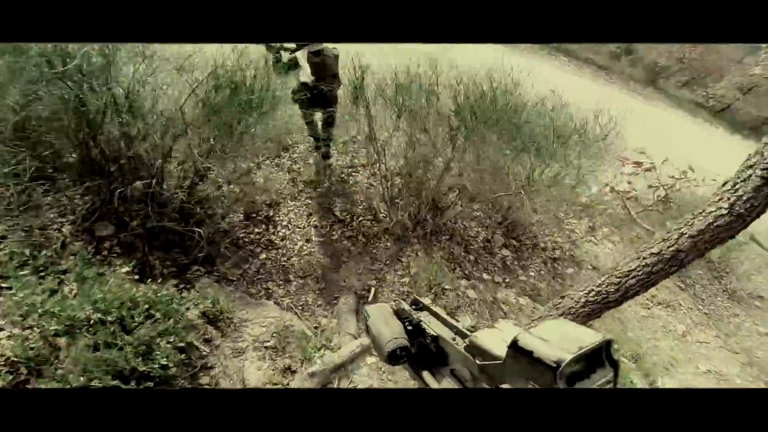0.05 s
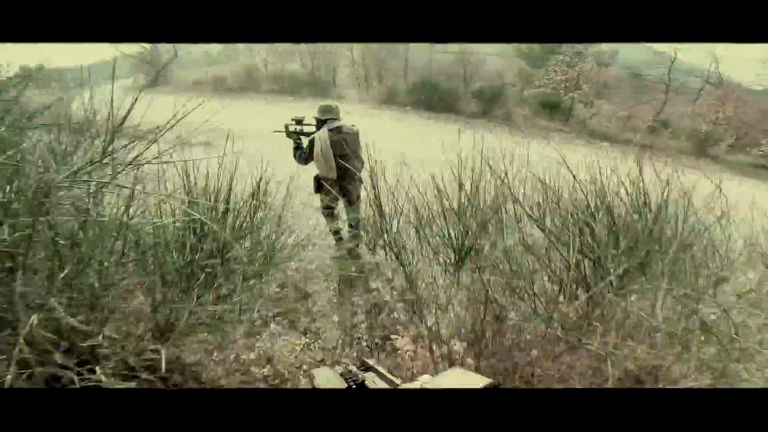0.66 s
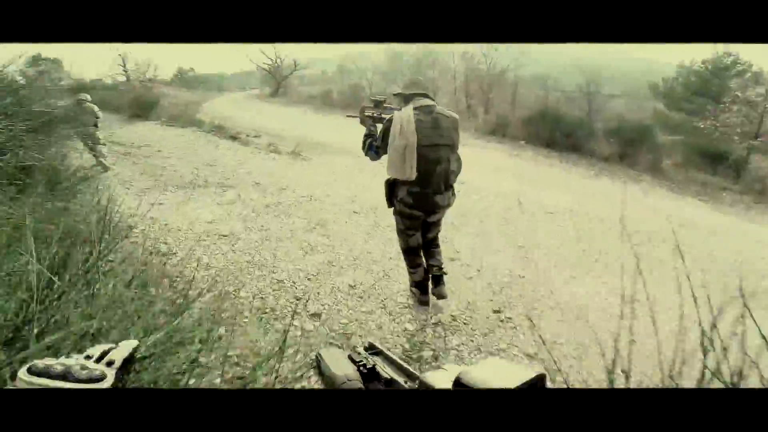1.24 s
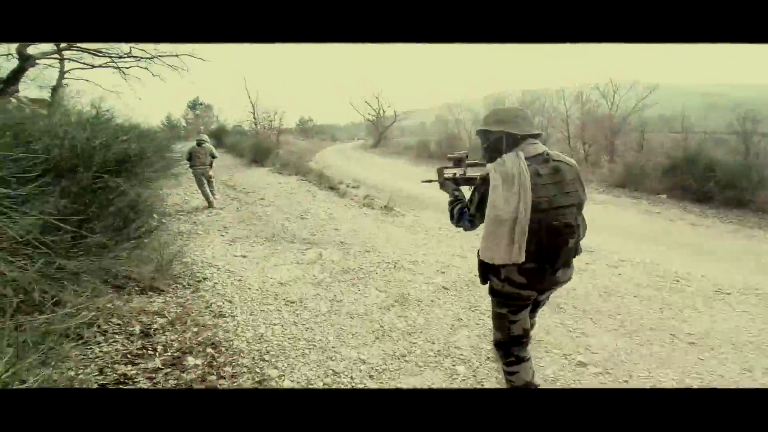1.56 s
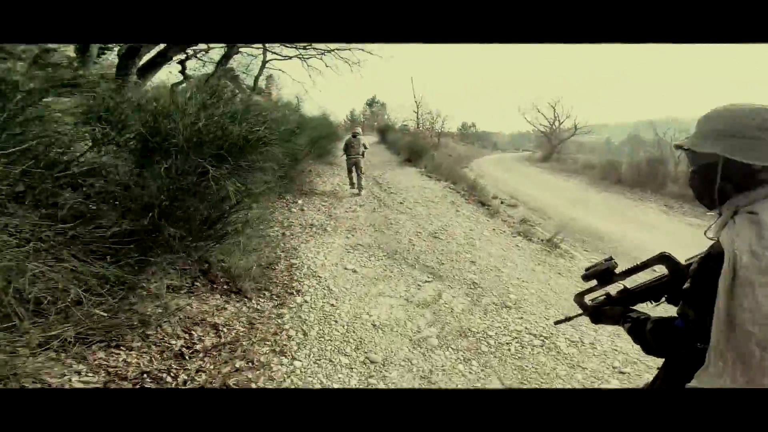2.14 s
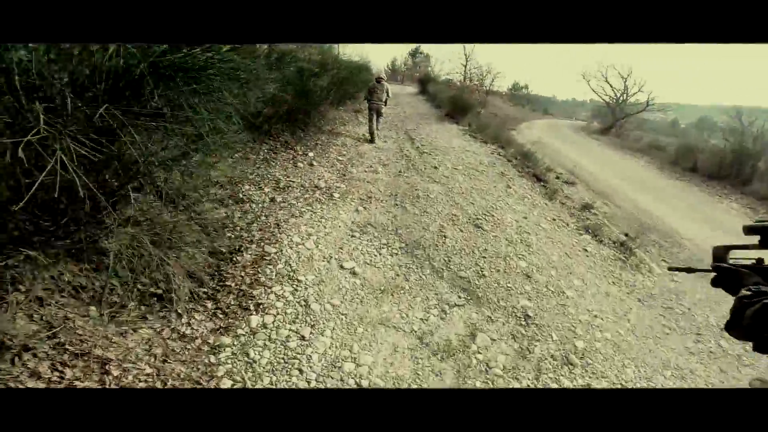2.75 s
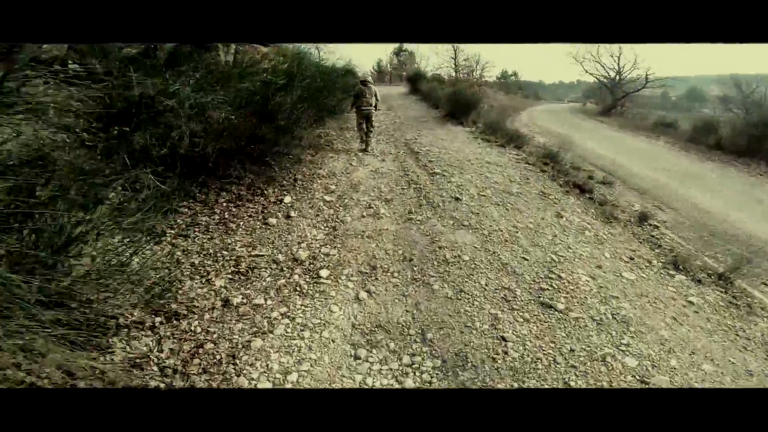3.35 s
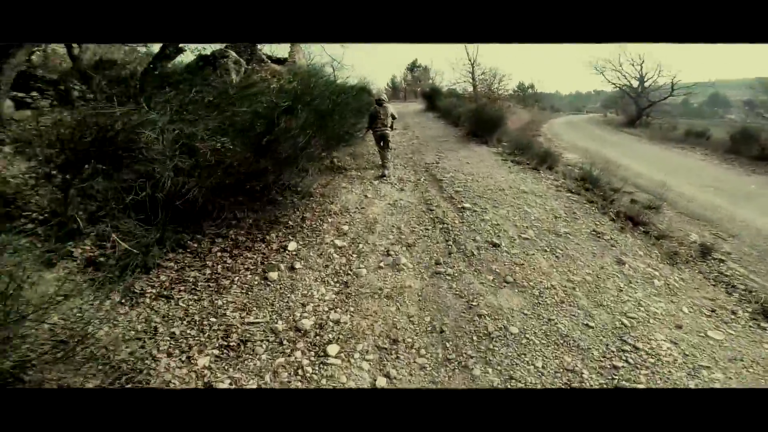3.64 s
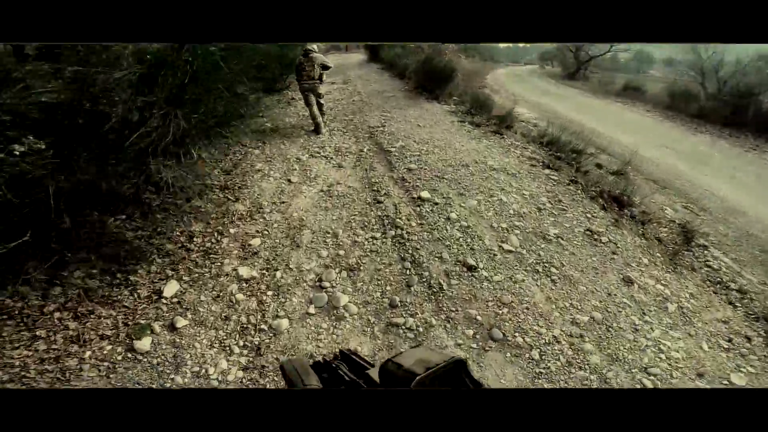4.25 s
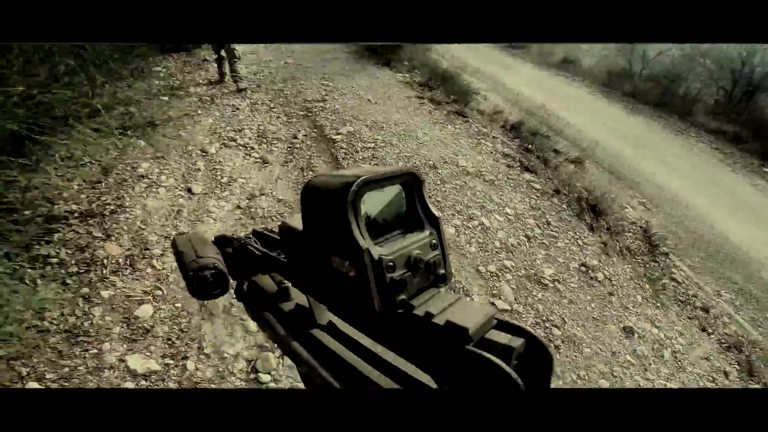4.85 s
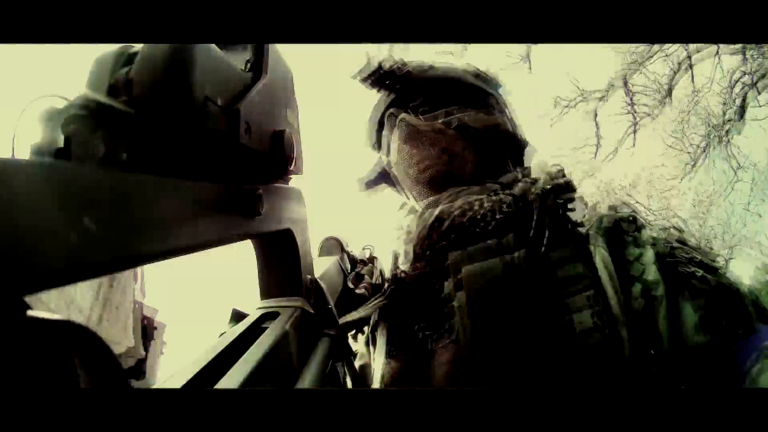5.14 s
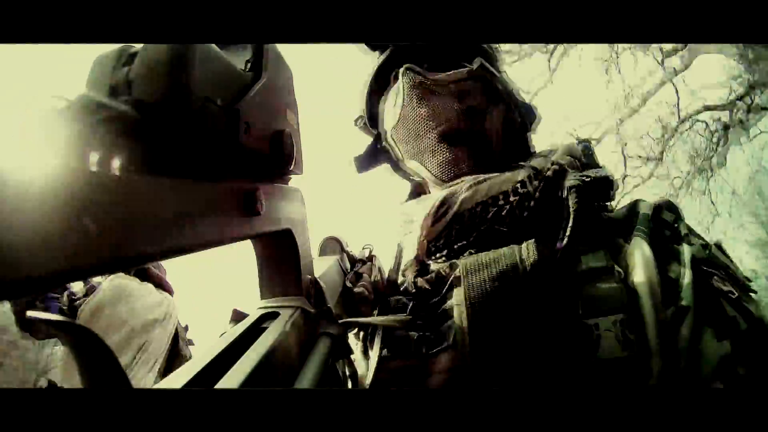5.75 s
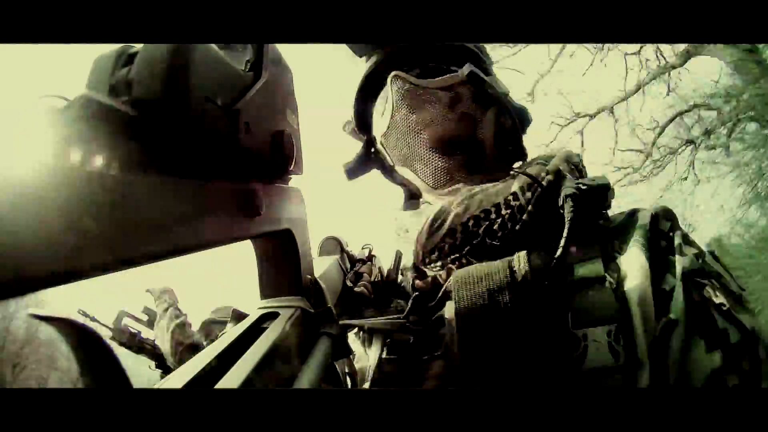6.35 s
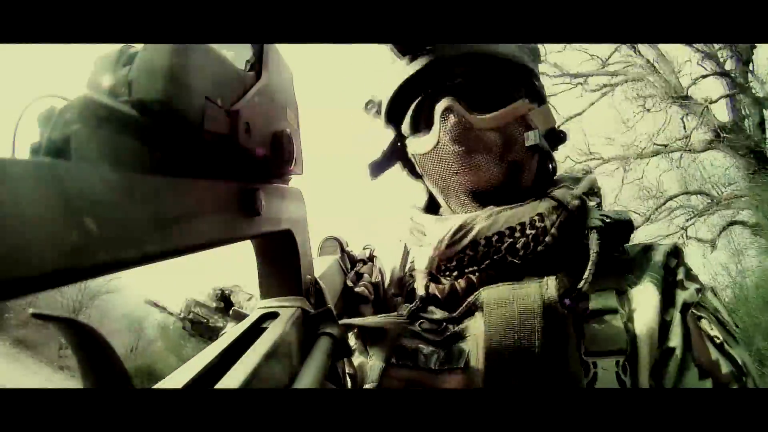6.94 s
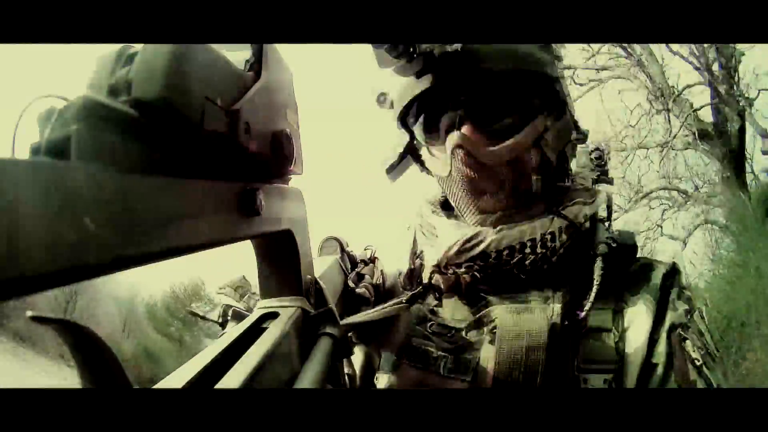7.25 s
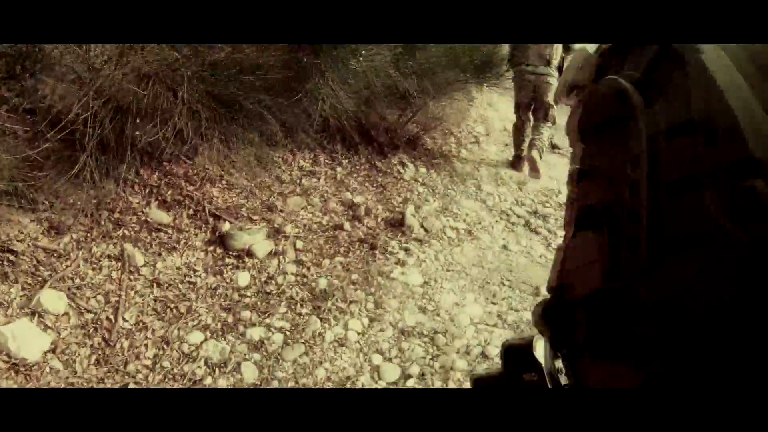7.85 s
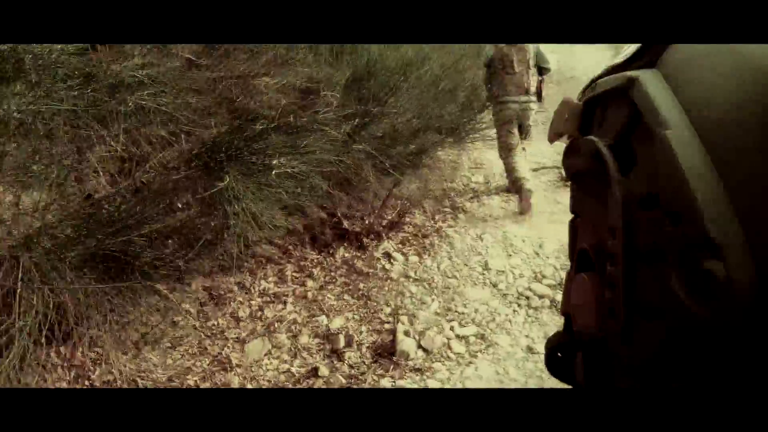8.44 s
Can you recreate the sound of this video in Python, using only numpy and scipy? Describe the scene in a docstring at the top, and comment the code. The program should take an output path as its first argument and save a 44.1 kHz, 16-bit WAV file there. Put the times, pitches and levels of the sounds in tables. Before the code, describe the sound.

Someone in field gear hurries outdoors, heard close from a camera strapped to the body. Uneven steps land as deep, dull thuds with a lighter gravel crunch over a soft low rumble of air. For the first 1.4 seconds dry stems crackle and swish, while gear knocks on the case at about 0.4, 0.8 and 1.4 seconds, with a sharp click at 1.2. A loud, booming double bump with a short rasp comes just after 2 seconds. From 3 to 5 seconds the steps are steadier, about two a second, with scuffs and loose stones snapping aside. A hard knock and crack at 5.4 seconds overloads the microphone and briefly dips the level. Slower steps continue, with a heavier one at 6.8. A faint low hum sets in around 7.5 seconds and stays, and another heavy thump hits at 8.1, among lighter steps.

```python
"""Hurrying through brush and gravel

Someone in field gear hurries through brush and along a gravel track, a camera strapped to the body.
Treads thud through the strap and crunch the stones; gear knocks, clicks and rubs on the camera's case.
Hard jolts overload the microphone and duck its gain. A faint hum sets in near the end."""
import sys
import numpy as np
from scipy import signal
from scipy.fft import rfft, irfft, next_fast_len
from scipy.io import wavfile
from scipy.ndimage import uniform_filter1d, minimum_filter1d, map_coordinates

SR = 44100
rng = np.random.default_rng(int(sys.argv[2]) if len(sys.argv) > 2 else 0)


def generate_wav(signal):
    """Clip the signal to [-1, 1] and save it as 16-bit WAV at the path in sys.argv[1]."""
    frames = np.transpose(np.atleast_2d(signal))
    scaled = np.clip(frames, -1, 1) * 32767
    pcm = np.round(scaled).astype(np.int16)
    wavfile.write(sys.argv[1], SR, pcm)


N = 383435
TIME = np.arange(N) / SR
AGE = np.arange(int(.4 * SR)) / SR  # seconds since a hit
TOP_HZ = 15400

# Footfalls. Each row: landing in seconds, then thud, gravel and gear-bump levels in dB.
FOOTFALLS = [(.372, -12, -61, -40), (0.778, -21, -58, -38), (1.763, -32.5, -64, -43),
             (2.531, -33, -73, -54), (2.944, -21, -55, -38), (3.392, -21, -64.5, -41.5),
             (3.722, -20, -50, -36), (4.119, -16.5, -52, -33), (4.597, -22, -53.5, -50.5),
             (5.032, -24, -52, -37), (5.155, -28.5, -65, -64), (5.608, -20.5, -57.5, -67),
             (6.18, -29.5, -56.5, -49.5), (6.752, -15, -52, -41), (7.221, -21, -65, -48),
             (7.821, -33, -74, -65), (8.39, -33.5, -61.5, -63)]
# Gear striking the camera. Each row: start in seconds, boom in dB, clack in dB, boom pitch in Hz,
# first rebound in dB relative to the blow.
GEAR_BLOWS = [(0.375, -28, -29.5, 128, -22), (.395, -16.5, -19.5, 110, -15.5), (.83, -3.5, -15.5, 235, -27),
              (.908, -9, -20.5, 239, -21.5), (1.216, -20.5, -17.5, 171, -22.5),
              (1.409, -4, -18.5, 216, -24.5), (1.464, -35, -32.5, 192, -28), (1.744, -38.5, -42, 123, -14),
              (2.0422, -2, -16.5, 107.6, -12.5), (2.125, -2, -23.5, 86.4, -6),
              (2.255, -17.5, -41.5, 120, -18), (3.279, -33.5, -47.5, 159, -14),
              (5.351, -2.5, -20, 249, -23), (5.355, 2.5, -9, 98.8, -30.5), (6.771, -19.5, -32.5, 121, -12),
              (8.095, 1.5, -26, 111.3, -32), (8.113, -10, -27.5, 84, -27), (8.164, -25, -41.5, 149, -10)]
# Tone curves of a thud through the strap, a clack on the case and a snapping stone.
# Each row: frequency in Hz, relative level in dB.
THUD_EQ = [(15, -9.5), (28, -2.5), (44, 3.5), (68, -7), (125, -17), (190, -30), (290, -31.5), (450, -52.5),
           (1200, -86.5)]
CLACK_EQ = [(150, 7.5), (400, 2.5), (600, -0.5), (830, 8.5), (1100, -0.5), (1550, 6), (2400, -1),
            (3100, -10), (3900, -18.5), (6300, -35.5), (9000, -57), (15000, -48.5)]
STONE_EQ = [(700, -15), (1900, -2.5), (2400, -3.5), (2950, 2.5), (3900, -1), (5200, -0.5), (6400, 1),
            (7500, -6.5), (9000, -18.5), (10400, -10), (12000, -23.5), (15000, -25)]


def amp(db):
    """Decibels to gain."""
    return 10 ** (np.asarray(db) / 20)


def unit(x):
    """Scale to rms 1."""
    return x / np.sqrt(np.mean(x ** 2) + 1e-20)


def burst(x, span):
    """Scale a hit to rms 1 over its first span seconds."""
    return x / np.sqrt(np.mean(x[:int(span * SR)] ** 2) + 1e-20)


def fade(t60):
    """A hit's tail, falling 60 dB in t60 seconds."""
    return amp(-60 * AGE / t60)


def add(track, s, sound):
    """Mix a sound into the track at s seconds."""
    start = max(round(s * SR), 0)
    track[start:start + len(sound)] += sound[:N - start]


def colour(x, eq, size=4096):
    """Minimum-phase EQ through (Hz, dB) points; white noise keeps its level."""
    hz, db = np.transpose(eq)
    curve_db = np.interp(np.log(np.fft.rfftfreq(size, 1 / SR) + 1), np.log(hz), db)
    cepstrum = irfft(np.log(amp(curve_db)))
    cepstrum[1:size // 2] *= 2
    cepstrum[size // 2 + 1:] = 0
    kernel = irfft(np.exp(rfft(cepstrum)))
    return signal.oaconvolve(x, kernel / np.linalg.norm(kernel))[:len(x)]


def modes(table):
    """One damped sine for each (Hz, dB, t60) row."""
    return np.array([amp(db) * fade(t60) * np.sin(2 * np.pi * hz * AGE) for hz, db, t60 in table])


def grains(size, rate, spread_db):
    """Tiny random impacts of uneven strength, about rate a second, rms 1."""
    strength = amp(spread_db * np.minimum(rng.exponential(size=size), 3))
    return unit((rng.random(size) < rate / SR) * strength * rng.choice([-1, 1], size))


def pings(rate, pitch_hz, cycles, spread_db, size=160):
    """Small colliding bits, each ringing briefly within an octave of pitch_hz, rms 1."""
    when, pitch, force = np.hsplit(rng.random((int(rate * N / SR), 3)), 3)
    samples = (when * N).astype(int) + np.arange(size)
    hz = pitch_hz * 2 ** (2 * pitch - 1)
    strength = amp(spread_db * np.minimum(-np.log(1 - force), 3))
    turns = hz * np.arange(size) / SR
    rings = strength * np.sin(2 * np.pi * turns) * np.exp(-turns / cycles)
    return unit(np.bincount(samples.ravel(), rings.ravel(), N)[:N])


def swells(rows):
    """An envelope of bell-shaped strokes from (middle s, half length s, dB) rows."""
    track = np.zeros(N)
    for s, half, db in rows:
        start = max(s - 3 * half, 0)
        t = start + np.arange(int(6 * half * SR)) / SR
        add(track, start, amp(db) * np.exp(-.5 * ((t - s) / half) ** 2))
    return track


def wobble(rate):
    """A smooth random curve, rate knots a second."""
    return map_coordinates(rng.standard_normal(int(N * rate / SR) + 4), [TIME * rate])


def landings(roll_lag_s=.09, strap_db=-12.5):
    """(s, thud dB) of all that shakes the strap: heels, rolls onto the ball of the foot, gear blows."""
    heels = [(s, db) for s, db, _, _ in FOOTFALLS]
    rolls = [(s + roll_lag_s, -21.5 + .54 * db) for s, db in heels]
    return heels + rolls + [(s, db + strap_db) for s, db, _, _, _ in GEAR_BLOWS]


def treads(rise_s=.0022, shudder_t60=.32, heave_hz=44, heave_t60=.22, heave_db=-2):
    """The body's weight lands softly; only a deep heave and shudder get up through the strap."""
    track = np.zeros(N)
    attack = 1 - np.exp(-AGE / rise_s)
    for s, db in landings():
        jolt = rng.standard_normal(len(AGE)) * attack * fade(shudder_t60)
        shudder = burst(colour(jolt, THUD_EQ), .06)
        hz = heave_hz * rng.lognormal(0, .16)
        heave = burst(np.sin(2 * np.pi * hz * AGE) * attack * fade(heave_t60), .06)
        add(track, s, amp(db) * burst(shudder + amp(heave_db) * heave, .06))
    return track


def contacts(bump_lag_s=.025, bump_hz=128, flight_s=.016, loss_db=2.5, rebound_hz=208):
    """(s, boom dB, clack dB, Hz) as gear swings in after each step, or strikes and rebounds thrice."""
    rows = [(s + bump_lag_s, db + 4, db, bump_hz) for s, _, _, db in FOOTFALLS]
    for s, boom_db, clack_db, hz, rebound_db in GEAR_BLOWS:
        rows.append((s, boom_db, clack_db, hz))
        for k, delay in enumerate(np.cumsum(flight_s * rng.lognormal(0, .12, 3))):
            db = rebound_db - loss_db * k
            rows.append((s + delay, boom_db + db - 4, clack_db + db, rebound_hz))
    return rows


def knocks(life_cycles=8.2, build_cycles=.52, mount_db=-8, clack_rise_s=.0015, chatter_db=-15):
    """A bump booms for a few cycles, rocks the mount and clacks the case, which chatters in its clip."""
    # The camera rocking on its mount. Each row: pitch in Hz, relative level in dB, t60 in seconds.
    mount_modes = [(53.5, 0.5, 0.066), (76.5, -12.5, 0.29), (139, -2, 0.088), (284.5, 2.5, 0.049),
                   (411, 4.5, 0.025), (536, -10.5, 0.039)]
    booms, clacks = np.zeros(N), np.zeros(N)
    rocking, mode_hz = modes(mount_modes), np.array(mount_modes)[:, 0]
    striking = (1 - np.exp(-AGE / clack_rise_s)) * fade(.022)
    for s, boom_db, clack_db, hz in contacts():
        # Soft, low bumps build up slowly and hardly reach the mount's upper modes.
        push = 1 - np.exp(-hz * AGE / build_cycles)
        reach = amp(mount_db) / np.hypot(1, mode_hz / hz)
        tone = np.sin(2 * np.pi * hz * AGE) * fade(life_cycles / hz)
        boom = push * (tone + reach @ rocking)
        contact = rng.standard_normal(len(AGE)) * striking
        chatter = amp(chatter_db) * grains(len(AGE), rate=650, spread_db=7) * fade(.075)
        add(booms, s, amp(boom_db) * burst(boom, .02))
        add(clacks, s, amp(clack_db) * burst(contact + chatter, .01))
    return booms + colour(clacks, CLACK_EQ)


def crunch(press_half_s=.041, sand_gain=.38, loose_db=-7, drag_dirt_db=-8.5, clump_db=3):
    """Soles grind pebbles in clumps over hissing sand and duller packed dirt; loose stones tick aside."""
    # Feet dragging between steps. Each row: middle and half length in seconds, gravel level in dB.
    scuffs = [(1.06, 0.058, -55.5), (2.69, 0.064, -58.5), (3.09, 0.027, -52.5), (3.26, 0.13, -56.5),
              (3.885, 0.027, -51.5), (4.05, 0.1, -77), (4.33, 0.068, -55), (4.71, 0.018, -49),
              (5.25, 0.18, -66), (5.83, 0.094, -61), (6.11, .04, -60), (7.36, 0.033, -57),
              (7.72, 0.11, -59.5), (8.55, 0.039, -59.5)]
    # Tone curves of gravel and packed dirt. Each row: frequency in Hz, relative level in dB.
    gravel_eq = [(700, -37.5), (1900, 14), (2400, -18), (2950, 7), (3900, -11.5), (4800, 7), (5300, -9.5),
                 (6400, 2.5), (7500, -12.5), (9000, -11.5), (10400, 0), (12000, -33), (15000, -38)]
    dirt_eq = [(120, -3), (400, 1.5), (900, -4), (1900, -3), (2500, -8), (4000, -29.5)]
    drags = swells(scuffs)
    on_gravel = swells([(s, press_half_s, db) for s, _, db, _ in FOOTFALLS]) + drags
    on_dirt = swells([(s, press_half_s, -33 + 1.05 * thud_db) for s, thud_db, _, _ in FOOTFALLS])
    on_dirt += amp(drag_dirt_db) * drags
    grit = pings(rate=290, pitch_hz=4400, cycles=2.9, spread_db=2.5)
    gravel = unit(colour(grit + sand_gain * rng.standard_normal(N), gravel_eq))
    loose = unit(colour(pings(rate=36, pitch_hz=5970, cycles=.86, spread_db=3), STONE_EQ))
    dirt = colour(grains(N, rate=760, spread_db=3.5), dirt_eq)
    clumps = unit(amp(clump_db * wobble(rate=60)))
    return clumps * (dirt * on_dirt + (gravel + amp(loose_db) * loose) * on_gravel)


def brush():
    """Dry stems crackle and swish against the legs on the way to the track."""
    # The fader ride of the stems. Each row: time in seconds, level in dB.
    ride = [(0, -52), (.25, -61), (.5, -53.5), (.65, -57.5), (.8, -63), (1.1, -60.5), (1.25, -50),
            (1.4, -57.5)]
    # Tone curve of dry twigs. Each row: frequency in Hz, relative level in dB.
    twig_eq = [(300, 7.5), (1000, -9), (1900, -5.5), (3000, -11), (6300, -3), (8500, -22.5), (10500, -14),
               (15000, -26.5)]
    crackle = pings(rate=170, pitch_hz=2300, cycles=2.8, spread_db=2)
    swish = grains(N, rate=920, spread_db=2)
    level_db = np.interp(TIME, *np.transpose(ride), right=-120)
    return amp(level_db) * unit(colour(crackle + swish, twig_eq))


def shrubs(tap_t60=.029):
    """Woody stems patter on the case as the body pushes through them."""
    # Pushes through the shrubs. Each row: middle and half length in seconds, level in dB.
    pushes = [(.79, 0.047, -43), (1.08, 0.082, -46)]
    tap_energy = signal.oaconvolve(grains(N, rate=70, spread_db=3) ** 2, fade(tap_t60) ** 2)[:N]
    patter = np.sqrt(np.abs(tap_energy)) * rng.standard_normal(N)
    return swells(pushes) * unit(colour(patter, CLACK_EQ))


def stones(ring_hz=5200, ring_db=-10, skitter_db=-17, skitter_t60=.22):
    """A stone snaps aside, rings briefly at its own pitch and skitters."""
    # The loudest snaps of stones and twigs. Each row: start in seconds, level in dB.
    snaps = [(0.434, -38), (0.707, -48), (0.878, -47), (2.924, -44), (3.057, -45.5), (3.26, -49.5),
             (3.891, -51), (4.022, -39.5), (4.049, -43), (4.068, -39.5), (4.115, -40.5), (4.274, -45.5),
             (4.601, -37), (4.696, -46), (5.085, -45), (6.066, -51), (6.11, -46), (6.179, -52.5),
             (6.786, -38.5), (7.2, -48), (7.319, -54.5), (8.519, -53)]
    track = np.zeros(N)
    for s, db in snaps:
        hz = ring_hz * rng.lognormal(0, .3)
        ring = amp(ring_db) * np.sin(2 * np.pi * hz * AGE)
        snap = (rng.standard_normal(len(AGE)) + ring) * fade(.022)
        skitter = amp(skitter_db) * grains(len(AGE), rate=700, spread_db=4) * fade(skitter_t60)
        add(track, s, amp(db) * burst(snap + skitter, .01))
    return colour(track, STONE_EQ)


def clicks(crack_t60=.014, ring_db=-4, scatter_db=3, db_per_octave=15):
    """Buckles and stems crack on the case, ringing a new blend of its modes; light taps are duller."""
    # Taps on the case. Each row: start in seconds, level in dB.
    taps = [(.402, -27.5), (0.756, -45), (.83, -20.5), (0.946, -29), (1.001, -40), (1.181, -40),
            (1.205, -34), (1.2165, -8), (1.225, -16.5), (1.316, -38.5), (1.637, -44), (1.793, -43),
            (3.701, -45), (4.669, -45), (4.853, -45), (5.3565, -20), (5.366, -34), (5.864, -48),
            (6.481, -38), (7.376, -51.5), (7.734, -54), (7.92, -47.5), (8.097, -27)]
    # The ring of the plastic case. Each row: pitch in Hz, relative level in dB, t60 in seconds.
    case_modes = [(860, -11.5, 0.01), (1200, -3.5, 0.0054), (1467, -0.5, 0.024), (1610, -9, 0.022),
                  (1940, 1, 0.034), (2134, -12, 0.11), (2863, -2.5, 0.03), (3320, -14.5, 0.0091),
                  (3980, -5, 0.024), (4440, -15, 0.016), (5764, -2, 0.017), (7250, -7, 0.0095)]
    # Tone curve of the crack. Each row: frequency in Hz, relative level in dB.
    crack_eq = [(200, -16), (700, -6), (1250, 5), (2800, 4.5), (4000, 1.5), (5100, -11.5), (5900, -5),
                (8000, -14.5), (14000, -23)]
    track, ringing = np.zeros(N), modes(case_modes)
    for s, db in taps:
        crack = colour(rng.standard_normal(len(AGE)) * fade(crack_t60), crack_eq)
        strengths = amp(scatter_db * rng.standard_normal(len(case_modes)))
        ring = (strengths * rng.choice([-1, 1], len(case_modes))) @ ringing
        corner_hz = min(19000 * 2 ** (db / db_per_octave), TOP_HZ)
        tap = signal.lfilter(*signal.butter(1, corner_hz, fs=SR), unit(crack) + amp(ring_db) * unit(ring))
        add(track, s, amp(db) * burst(tap, .01))
    return track


def rubs():
    """The weave of a strap catches on the case and excites its main resonance."""
    # Cloth sliding over the case. Each row: middle and half length in seconds, level in dB.
    slides = [(.335, 0.027, -35.5), (2.3, 0.035, -45), (6.13, 0.091, -60), (7.7, 0.055, -53)]
    # Tone curve of cloth on plastic. Each row: frequency in Hz, relative level in dB.
    cloth_eq = [(500, -11), (1500, -27), (1850, 4.5), (2050, 6), (2400, -12.5), (3000, -7), (3900, -9),
                (5000, -14), (6500, -26), (14000, -43.5)]
    return swells(slides) * unit(colour(grains(N, rate=17000, spread_db=13.5), cloth_eq))


def grinds():
    """Hard gear sticks and slips on the case in a dull, dense rasp."""
    # Gear dragged hard over the case. Each row: middle and half length in seconds, level in dB.
    scrapes = [(.403, 0.0062, -24), (2.073, 0.017, -24), (2.155, 0.015, -25.5), (4.146, 0.016, -42),
               (5.357, 0.003, -14.5), (6.781, .012, -33.5)]
    # Tone curve of the rasp. Each row: frequency in Hz, relative level in dB.
    rasp_eq = [(120, -5.5), (290, 12), (500, -13.5), (720, 4), (950, 6), (1120, -13.5), (1400, -1),
               (2300, -7), (3100, -14), (3500, -29), (6000, -36), (15000, -55)]
    return swells(scrapes) * unit(colour(grains(N, rate=900, spread_db=4), rasp_eq))


def sway(lag_s=.067, half_s=.1, floor_db=-50):
    """The swaying body rumbles, swelling around each landing, more so on heavy ones."""
    swings = swells([(s + lag_s, half_s, -28 + .43 * thud_db) for s, thud_db, _, _ in FOOTFALLS])
    return (amp(floor_db) + swings) * unit(colour(rng.standard_normal(N), THUD_EQ))


def air(level_db=-42, lull_at_s=1.85, lull_half_s=.3, lull_db=-4.5):
    """A bed of open air and microphone hiss; the background dips for a moment."""
    # Tone curve of the open air. Each row: frequency in Hz, relative level in dB.
    air_eq = [(12, -31), (20, 0), (43, -3.5), (60, -13), (134, -9), (228, -25), (293, -21.5), (328, -26),
              (485, -29), (607, -30.5), (1400, -35), (2990, -39.5), (6180, -47), (14700, -59), (16000, -62)]
    lull = np.exp(-.5 * ((TIME - lull_at_s) / lull_half_s) ** 2)
    return amp(level_db + lull_db * lull) * unit(colour(rng.standard_normal(N), air_eq))


def hum(start_s=7.47, rise_s=.077, level_db=-51.5):
    """A faint low hum fades in and stays."""
    # The hum's partials. Each row: pitch in Hz, relative level in dB.
    partials = [(84, 0), (124, -19), (166.9, 3), (205, -14), (247.6, -8), (331, -13), (376, -19),
                (414.5, -11.5)]
    drone = sum(amp(db) * np.sin(2 * np.pi * (hz * TIME + rng.random())) for hz, db in partials)
    return amp(level_db) * np.clip((TIME - start_s) / rise_s, 0, 1) * drone


def width(murmur_db=-50, hiss_db=-97):
    """A faint low murmur and a trace of hiss that set the two ears apart."""
    # Tone curve of the murmur. Each row: frequency in Hz, relative level in dB.
    murmur_eq = [(12, -55), (20, -22.5), (54, 1), (96, -5), (129, 0.5), (223, -16), (332, -18),
                 (736, -35.5), (1380, -65), (3000, -63.5), (3900, -89.5), (6600, -120)]
    murmur = unit(colour(rng.standard_normal(N), murmur_eq))
    return amp(murmur_db) * murmur + amp(hiss_db) * rng.standard_normal(N)


def scene():
    """Feet, gear and background sit dead centre; only the murmur and its hiss spread to the sides."""
    action = treads() + knocks() + crunch() + brush() + shrubs() + stones() + clicks() + rubs() + grinds()
    mid = action + sway() + air() + hum()
    side = width()
    return np.array([mid + side, mid - side])


def ducking(x, ceiling=1.057, hold_s=.11, release_db_per_s=32, deepest_db=7.5, smooth_samples=400):
    """The camera's gain: peaks over the ceiling pull it down; it holds, then climbs back."""
    needed_db = np.maximum(20 * np.log10(ceiling / np.maximum(np.abs(x), ceiling)), -deepest_db)
    half = int(hold_s * SR / 2)
    held_db = minimum_filter1d(needed_db, 2 * half + 1, origin=half - smooth_samples // 2)
    climb_db = release_db_per_s * TIME
    gain_db = np.minimum.accumulate(held_db - climb_db) + climb_db
    return amp(uniform_filter1d(gain_db, smooth_samples))


def record(dry, low_hz=14):
    """The camera ducks on jolts, clips what gets past, and cuts the extremes of the band."""
    clipped = np.clip(dry * ducking(dry.mean(axis=0)), -1, 1)
    size = next_fast_len(N + SR // 2, real=True)
    hz = np.fft.rfftfreq(size, 1 / SR)
    low_pass = 1 / (1 + (hz / TOP_HZ) ** 90)
    high_pass = hz / (hz - 1j * low_hz)
    return irfft(rfft(clipped, size) * low_pass * high_pass, size)[:, :N]


dry = scene()
out = record(dry)
generate_wav(out)
```